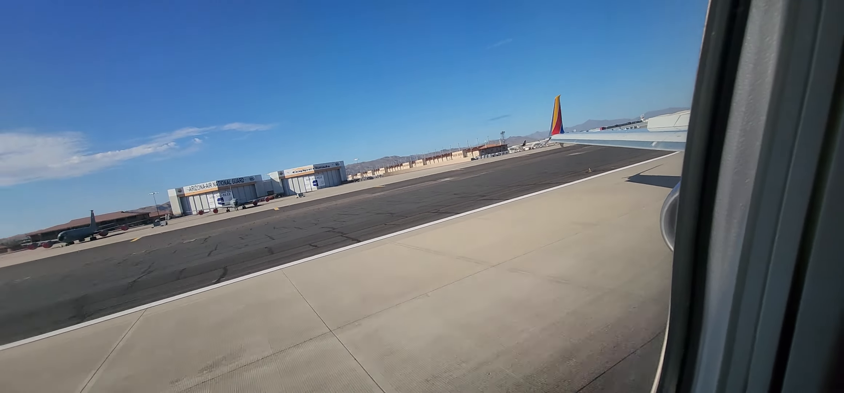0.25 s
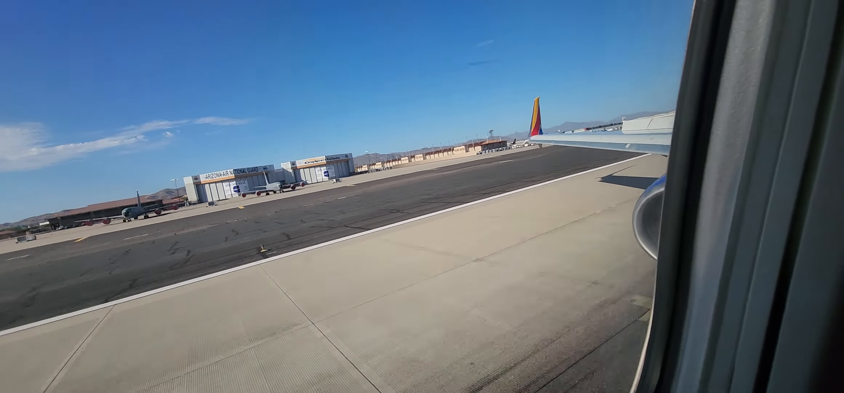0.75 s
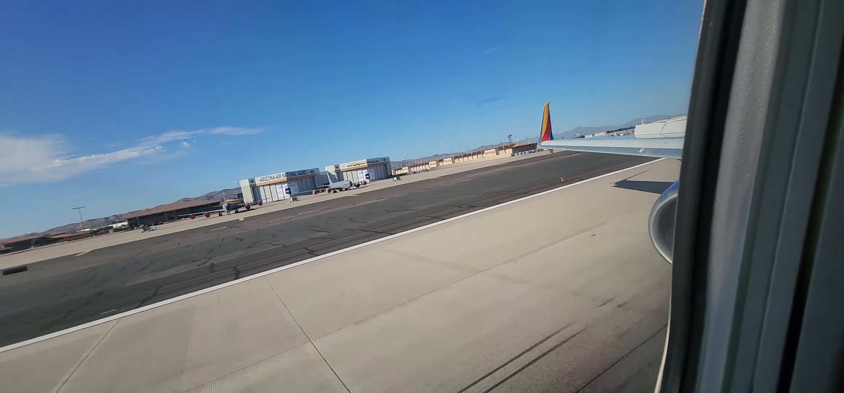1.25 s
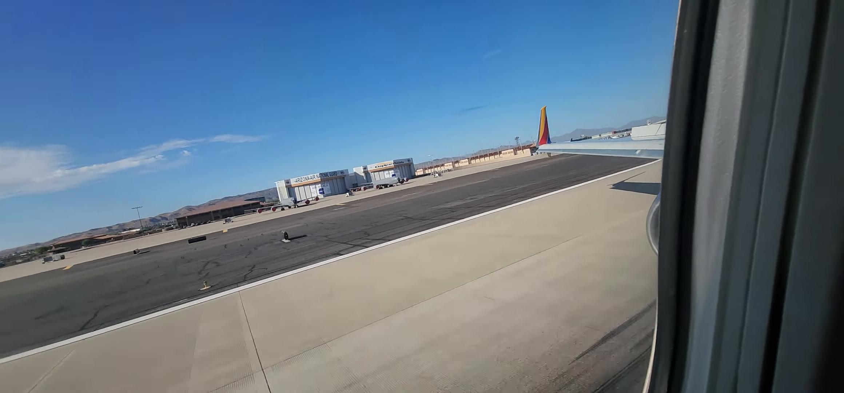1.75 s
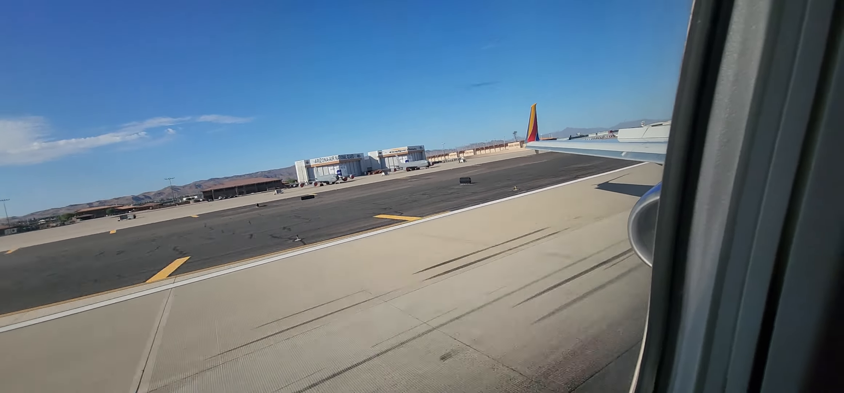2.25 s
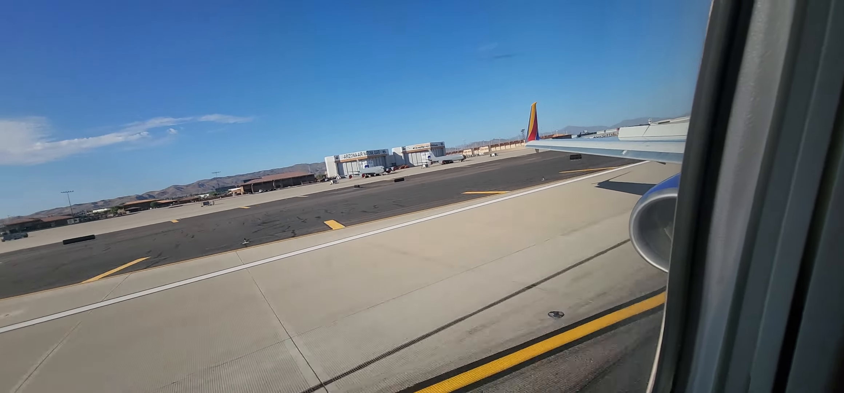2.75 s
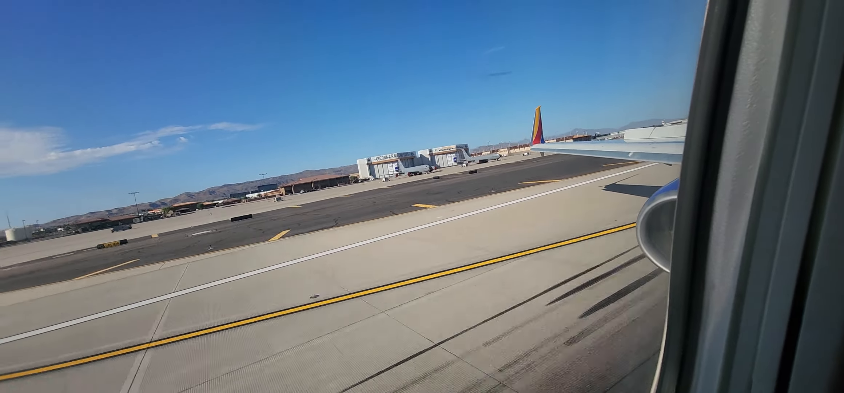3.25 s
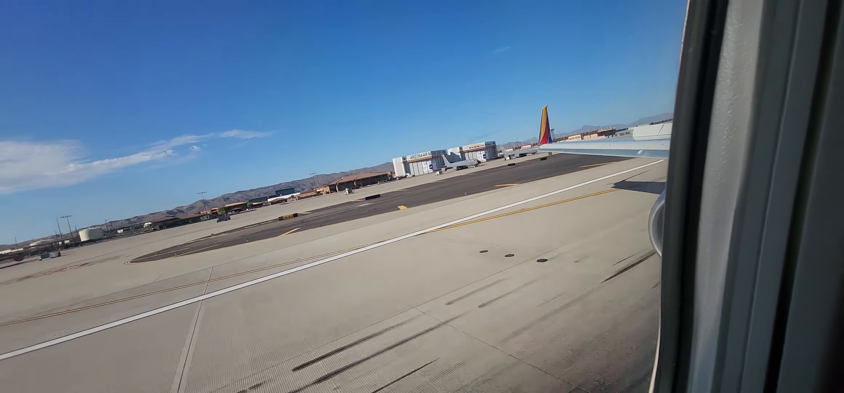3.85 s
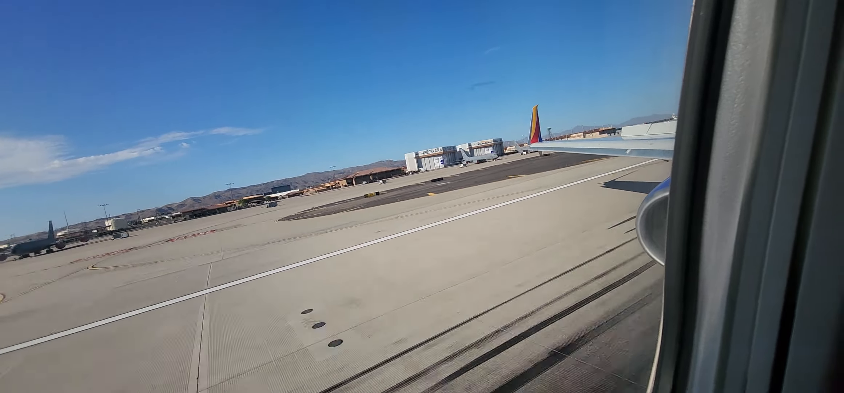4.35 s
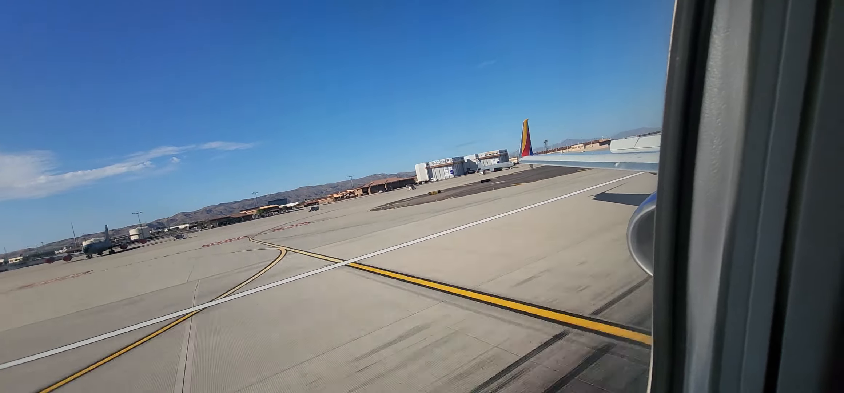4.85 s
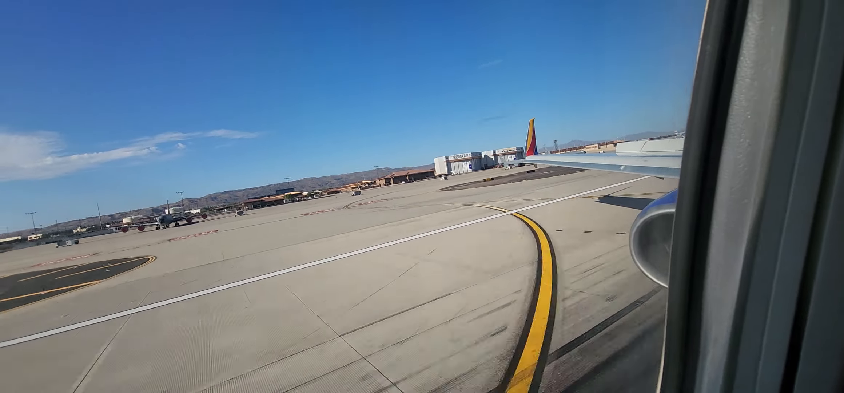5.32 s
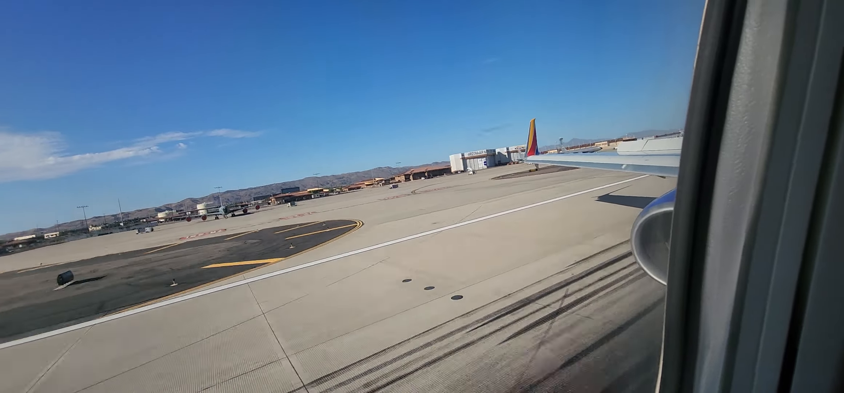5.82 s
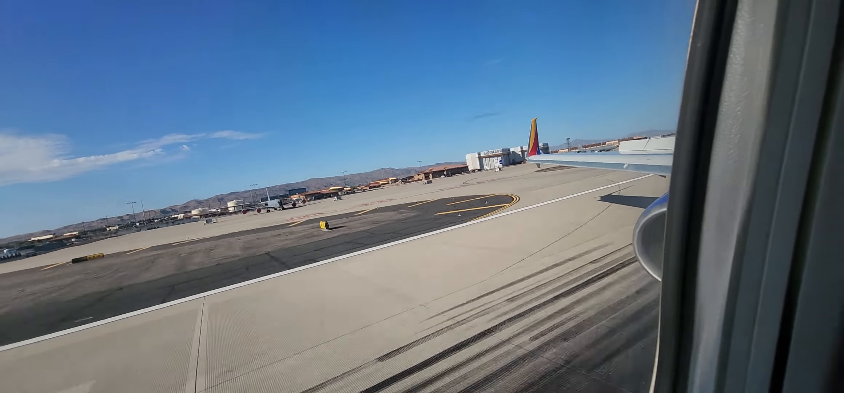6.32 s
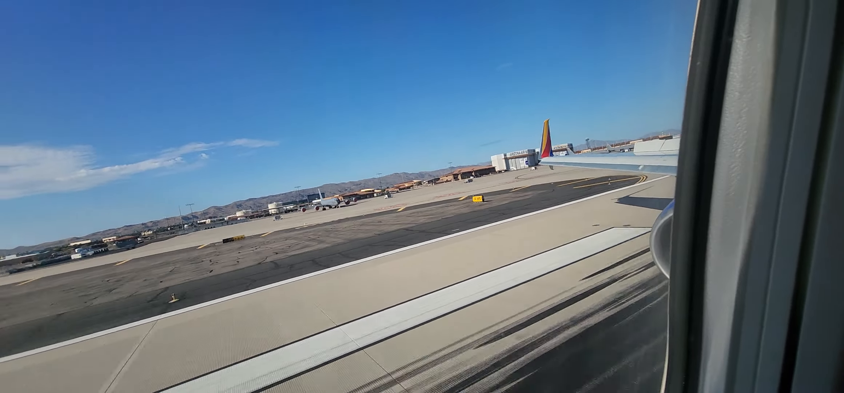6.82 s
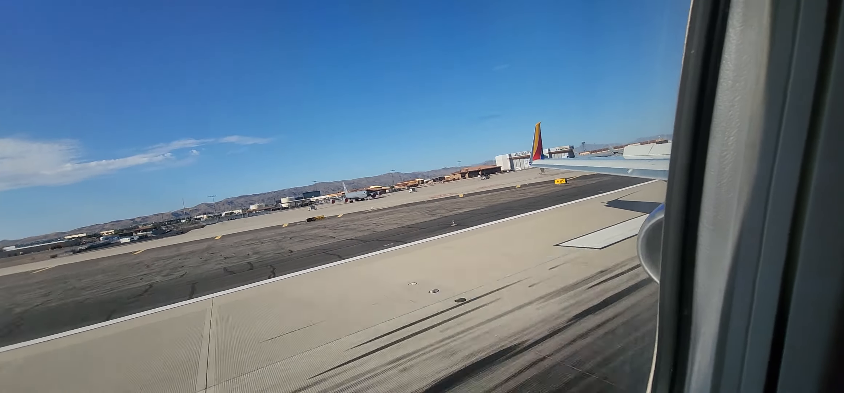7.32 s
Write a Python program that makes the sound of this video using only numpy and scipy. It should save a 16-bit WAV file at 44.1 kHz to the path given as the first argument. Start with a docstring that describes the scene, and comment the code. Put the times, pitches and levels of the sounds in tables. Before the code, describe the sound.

Heard from a window seat in a landing plane: a dense, boomy roar of reversed jet engines over deep wheel rumble, muffled by the fuselage, fluttering slightly and easing very little. Loose plastic trim nearby clicks and rattles irregularly, with a quieter gap around three to four seconds. Sharp dry snaps come near the end, over faint rustle and vent hiss. Wide stereo handheld microphone, level evened out.

```python
"""Airliner cabin after touchdown

Reverse-thrust roar and wheel rumble, both shaped noise, boom through resonant fuselage modes.
Loose trim rattles (noise bursts plus decaying sines), rustles and snaps nearby; vents and swells hiss.
Two unlike ports listen, and fast gain control evens out the level."""
import sys
import numpy as np
from scipy.fft import rfft, irfft, next_fast_len
from scipy.io import wavfile
from scipy.ndimage import uniform_filter1d, map_coordinates

SR = 44100
rng = np.random.default_rng(int(sys.argv[2]) if len(sys.argv) > 2 else 0)


def wav_record(signal):
    """Record a signal, one row per channel, as 16-bit PCM in the file named by sys.argv[1]."""
    frames = np.transpose(np.atleast_2d(signal))
    bounded = np.clip(frames, -1, 1)
    # unit amplitude maps onto the largest positive 16-bit level
    quanta = np.round(bounded * 32767).astype(np.int16)
    wavfile.write(sys.argv[1], SR, quanta)


N = 334278


def engines():
    """Wheel rumble and jet roar pass through the fuselage and ease as the aircraft slows; the roar flutters."""
    # rumble spectrum: freq_hz, density_db
    rumble_db = [(20, -7), (36, -4), (48, 1), (110, 0.5), (150, -9), (300, -35)]
    # roar spectrum: freq_hz, density_db
    roar_db = [(80, -10.5), (130, -3.5), (160, 4), (450, -1), (620, -4), (820, -6.5), (930, -10.5),
               (1500, -10), (2200, -10.5), (2500, -21), (6000, -46)]
    rumble_start_db, roar_start_db, ease_db_per_s = -18.5, -18.5, 0.1321
    flutter_db, flutter_knots_per_s = 0.78, 11

    ease_db = -ease_db_per_s * np.arange(N) / SR
    rumble = rush(lambda hz: amp(along(rumble_db, hz)) * fuselage(hz))
    roar = rush(lambda hz: amp(along(roar_db, hz)) * fuselage(hz))
    rumble_gain = amp(rumble_start_db + ease_db)
    roar_gain = amp(roar_start_db + ease_db + flutter_db * wobble(flutter_knots_per_s))
    return rumble_gain * rumble + roar_gain * roar


def fuselage(hz):
    """Gain of the fuselage and panel modes at each port; they add in power in the diffuse cabin field."""
    # modes: center_hz, width_hz, left_db, right_db
    modes = [(58.5, 19, -0.25, 0), (102.6, 22, 0.2, 0.5), (167.2, 33, -3, -3.5), (195.2, 25.6, -3.5, -3),
             (239.1, 20.4, -2, -3), (332, 26.4, -11.5, -13.5), (394, 37, -25, -15), (427, 42.5, -12.5, -14),
             (560, 31, -23, -20), (750, 90, -21, -30.5), (807, 70, -31, -27.5), (1366, 76, -24.5, -30),
             (1760, 40, -32, -27), (2040, 250, -56, -40)]
    power = 0
    for center_hz, width_hz, left_db, right_db in modes:
        damping = (hz * width_hz) ** 2
        resonance = damping / ((center_hz ** 2 - hz ** 2) ** 2 + damping)
        power = power + amp([[left_db], [right_db]]) ** 2 * resonance
    return np.sqrt(power)


def rattle():
    """Each knock of loose trim chatters for some milliseconds, dies in the cabin and rings the trim modes."""
    # knocks: start_s, level_db
    knocks = [(.002, -38), (.0175, -46), (.1196, -54), (.1401, -50), (0.1674, -38), (.4704, -37),
              (0.7337, -36), (.7738, -41), (.9961, -50), (1.017, -44.5), (1.168, -40.5), (1.2022, -42),
              (1.498, -36), (1.5998, -44), (1.7074, -52), (1.915, -38.5), (1.95, -40), (2.0423, -52),
              (2.065, -42.5), (2.1668, -36.5), (2.256, -43.5), (2.2794, -51), (2.4104, -54), (2.5441, -54),
              (4.2148, -38), (4.3158, -38), (4.5717, -35), (4.6533, -48), (4.6678, -44), (4.684, -46),
              (4.8002, -36.5), (4.9227, -44), (5.331, -44), (5.5243, -43), (6.2548, -37.5), (6.329, -38.5),
              (6.3374, -48), (6.4572, -46.5), (6.556, -42.5), (6.679, -37), (6.7151, -42), (6.8338, -37.5),
              (7.2494, -55)]
    # bright noise spectrum: freq_hz, density_db
    bright_db = [(3000, -24), (5000, -4.5), (7500, -1), (10000, 0), (12000, 3.5), (14000, -3),
                 (16000, -8.5)]
    # duller body noise spectrum: freq_hz, density_db
    dull_db = [(800, -28), (1800, -5), (3000, 0), (5300, 0), (6800, -8), (9000, -50)]
    # trim modes: freq_hz, level_db, t60_s
    trim_modes = [(2853, -10, .09), (3442, -12, .07), (5340, -10, .09), (7400, -12, .07), (7835, -12, .07),
                  (8305, -12, .07), (8671, -9, .07), (11670, -12, .06), (12250, -13, .05)]
    # body_db is body over bright in a hard knock; growth below 1 makes soft knocks duller
    hard_body_db, body_growth, hard_db = -6.5, 0.59, -38
    knock_t60_s, chatter_t60_s, tail_t60_s, attack_s = 0.067, 0.0059, 0.26, 0.00053
    pan_scatter_db, mode_scatter_db = 1.4, 3

    bright = rush(lambda hz: amp(along(bright_db, hz)))
    body = rush(lambda hz: amp(along(dull_db, hz)))
    out, t = np.zeros((2, N)), np.arange(SR // 8) / SR
    mode_hz, mode_db, mode_t60_s = np.transpose(trim_modes)[:, :, None]
    fading = amp(mode_db - 60 * t / mode_t60_s) * np.exp(2j * np.pi * mode_hz * t)
    attack = 1 - np.exp(-t / attack_s)
    decay = 1.76 * amp(-60 * t / knock_t60_s) + 0.091 * amp(-60 * t / tail_t60_s)
    for start_s, level_db in knocks:
        body_db = hard_body_db + (body_growth - 1) * (level_db - hard_db)
        pan_db = rng.normal(0, pan_scatter_db)
        start = round(start_s * SR)
        now = slice(start, start + len(t))
        rebounds_s = np.cumsum(rng.uniform(0.0025, 0.0055, 4))
        chatter = 0
        for k, lag_s in enumerate([0, *rebounds_s]):
            chatter = chatter + .5 ** k * (t > lag_s) * amp(-60 * np.abs(t - lag_s) / chatter_t60_s)
        burst = attack * (decay + 1.73 * chatter) * (bright[:, now] + amp(body_db) * body[:, now])
        # random strength and phase per port and mode
        size = (2, len(trim_modes))
        strength = amp(rng.normal(0, mode_scatter_db, size)) * np.exp(2j * np.pi * rng.random(size))
        ring = (strength @ fading).imag
        out[:, now] += port_gains(level_db, pan_db) * (burst + 0.91 * ring)
    return out


def rustle():
    """Rubbing trim: fine-grained bright noise at a drifting level, with brief scuffs on top."""
    # steady rubbing: time_s, level_db
    rubbing = [(0, -58), (.6, -58), (1.9, -51), (2.4, -57.5), (2.9, -56.5), (4.1, -64), (4.5, -54.5),
               (5.2, -56.5), (5.7, -56.5), (6.5, -54.5), (7, -63), (7.58, -59)]
    # scuffs: start_s, hold_s, level_db
    scuffs = [(0, 0.043, -47.5), (2.41, .02, -50.5), (2.64, .09, -51), (4.94, 0.055, -49),
              (6.39, .05, -47.5), (7.26, .03, -53)]
    # spectrum: freq_hz, density_db
    rub_db = [(2500, -14), (4500, -7), (6600, -4), (7500, -6.5), (8400, -10), (9300, -10), (12000, -8),
              (16000, -11.5)]
    time_s, level_db = np.transpose(rubbing)
    steady = amp(np.interp(np.arange(N) / SR, time_s, level_db))
    level = steady + swells(scuffs, rise_db_per_s=250, fall_db_per_s=300)
    grain = amp(2.2 * wobble(300) + .5 * wobble(30))
    return level * unit(grain) * rush(lambda hz: amp(along(rub_db, hz)))


def ticks():
    """Dry snaps close by: noise bursts of about a millisecond, with no ring."""
    # snaps: start_s, level_db, left_over_right_db
    snaps = [(4.865, -25, 4), (5.3994, -40, 1), (6.4009, -26, 9), (6.6917, -19.5, 5.5), (7.3464, -37, 0)]
    # snap response: freq_hz, gain_db
    snap_db = [(1500, -28), (5000, -7), (10000, 3), (16000, 4)]
    attack_s, t60_s = .0003, .006
    out, t = np.zeros((2, N)), np.arange(SR // 100) / SR
    envelope = amp(-60 * t / t60_s) * (1 - np.exp(-t / attack_s))
    for start_s, level_db, pan_db in snaps:
        snap = rng.standard_normal((2, len(t))) * envelope
        start = round(start_s * SR)
        out[:, start:start + len(t)] += port_gains(level_db, pan_db) * snap
    return filtered(out, lambda hz: amp(along(snap_db, hz)))


def shh():
    """Short swells of noise in a narrow high band, finely flickering in level."""
    # swells: start_s, hold_s, level_db
    hisses = [(2.58, .15, -53), (6.38, .05, -58)]
    # spectrum: freq_hz, density_db
    band_db = [(5500, -32), (6900, -5), (7600, -5), (8300, -3), (9200, -16), (11700, -10), (14000, -26)]
    level = swells(hisses, rise_db_per_s=400, fall_db_per_s=300)
    return level * amp(1.2 * wobble(60)) * rush(lambda hz: amp(along(band_db, hz)))


def vents():
    """Smooth air hiss with faint duct resonances, wavering slightly."""
    # hiss spectrum: freq_hz, density_db
    hiss_db = [(1500, -26), (2500, -3.5), (3500, -0.5), (4800, 0), (6300, 0), (7500, -7.5), (10000, -6),
               (13000, -7), (16000, -8.5)]
    # duct resonances: center_hz, width_hz, added_db (20 log10 of the power added, relative to the hiss)
    duct_peaks = [(3510, 220, -5), (4660, 310, -4)]
    level_db, waver_db, waver_knots_per_s = -50, 1.04, 4.49

    def color(hz):
        """Hiss gain with the duct peaks added in power."""
        power = 1
        for center_hz, width_hz, added_db in duct_peaks:
            power = power + amp(added_db) / (1 + (2 * (hz - center_hz) / width_hz) ** 2)
        return amp(along(hiss_db, hz)) * np.sqrt(power)

    return amp(level_db + waver_db * wobble(waver_knots_per_s)) * rush(color)


def rush(gain):
    """Stereo noise of rms 1 and the given colour; port correlation follows frequency, high only in the bass."""
    # port likeness: freq_hz, correlation
    likeness = [(60, 1), (140, .98), (240, 0.97), (400, 0.81), (550, 0.87), (700, 0.14), (850, 0.048),
                (1150, -0.29), (1500, -0.33), (2200, -0.016), (4000, -0.038), (15000, 0.0002)]
    m = next_fast_len(N)
    a, b = rfft(rng.standard_normal((2, m)))
    hz = np.fft.rfftfreq(m, 1 / SR)
    turn = np.arccos(np.clip(along(likeness, hz), -1, 1)) / 2  # correlation = cos(2 turn)
    mid, side = a * np.cos(turn), b * np.sin(turn)
    spectrum = gain(hz) * np.array([mid + side, mid - side])
    return unit(irfft(spectrum, m)[:, :N])


def swells(rows, rise_db_per_s, fall_db_per_s):
    """Summed gain of events that rise before start_s, hold and fall, linearly in dB."""
    t = np.arange(N) / SR
    gain = 0
    for start_s, hold_s, level_db in rows:
        rise_db = rise_db_per_s * np.maximum(start_s - t, 0)
        fall_db = fall_db_per_s * np.maximum(t - start_s - hold_s, 0)
        gain = gain + amp(level_db - rise_db - fall_db)
    return gain


def port_gains(level_db, pan_db):
    """Left and right gains, pan_db apart."""
    return amp(level_db + pan_db * np.array([[.5], [-.5]]))


def wobble(knots_per_s):
    """Smooth random curve: a spline through unit normal knots."""
    knots = rng.standard_normal(int(N * knots_per_s / SR) + 4)
    return map_coordinates(knots, [np.arange(N) * knots_per_s / SR])


def filtered(x, response):
    """x through a zero-phase response of frequency."""
    m = next_fast_len(N + SR // 2)
    return irfft(rfft(x, m) * response(np.fft.rfftfreq(m, 1 / SR)), m)[..., :N]


def along(points, hz):
    """(Hz, value) points interpolated on a log frequency axis."""
    f, v = np.transpose(points)
    return np.interp(np.log(hz + 1), np.log(f + 1), v)


def amp(db):
    """Decibels to amplitude gain."""
    return 10 ** (np.asarray(db) / 20)


def unit(x):
    """Scaled to rms 1."""
    return x / np.sqrt(np.mean(x ** 2) + 1e-20)


def scene():
    """All sources at the seat, faded in over 2 ms."""
    fade_in_s = .002
    fade = np.sin(np.pi / 2 * np.minimum(np.arange(N) / SR / fade_in_s, 1)) ** 2
    return fade * (engines() + rattle() + rustle() + ticks() + shh() + vents())


def record(dry):
    """Two ports of unlike colour, fast shared gain control that evens out the boom, then the band limit."""
    # left and right port responses, each: freq_hz, gain_db
    port_colors = [
        [(2000, 0.5), (5500, 0), (6900, 1), (7600, 4.5), (8300, 1), (9600, -15.5), (11300, -10), (14200, -6),
         (15700, -9), (16200, -30)],
        [(2000, -0.5), (5500, -0.5), (6800, -1.5), (7400, 6), (8400, 3), (9700, -5), (11000, -1.5),
         (11700, 2.5), (13000, -4.5), (14500, -3.5), (15700, -8.5), (15950, -35)],
    ]
    window_s, output_db, top_hz = 0.0338, 0.59, 16250
    ports = filtered(dry, lambda hz: amp([along(port, hz) for port in port_colors]))
    power = np.abs(uniform_filter1d(np.mean(ports ** 2, axis=0), size=int(window_s * SR)))
    control = (power / np.mean(power) + 0.09) ** -.23  # louder moments get less gain
    held = ports * amp(output_db) * control
    return filtered(held, lambda hz: hz < top_hz)


dry = scene()
out = record(dry)
wav_record(out)
```